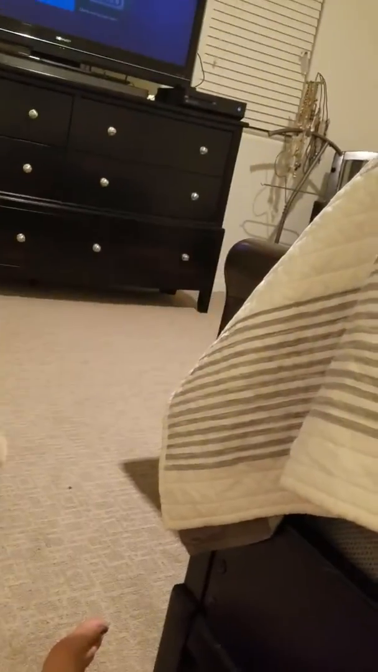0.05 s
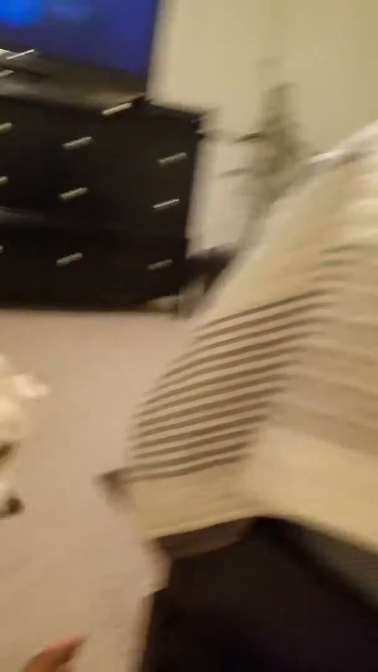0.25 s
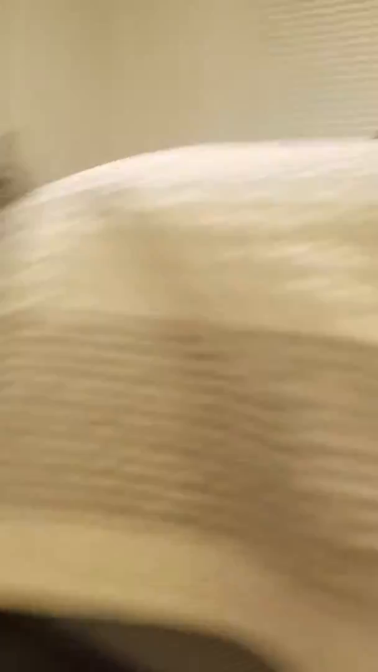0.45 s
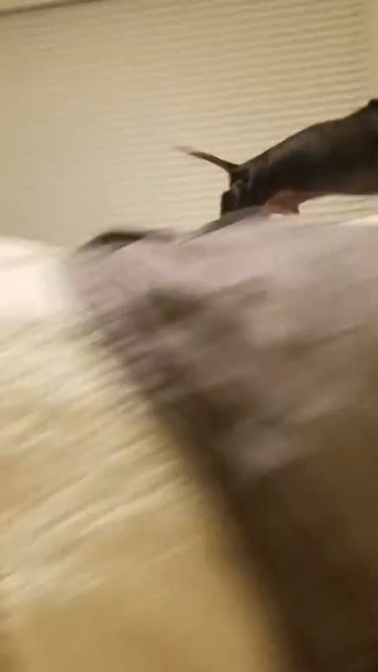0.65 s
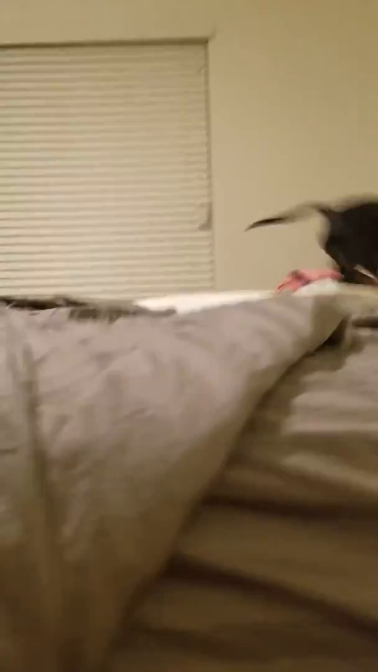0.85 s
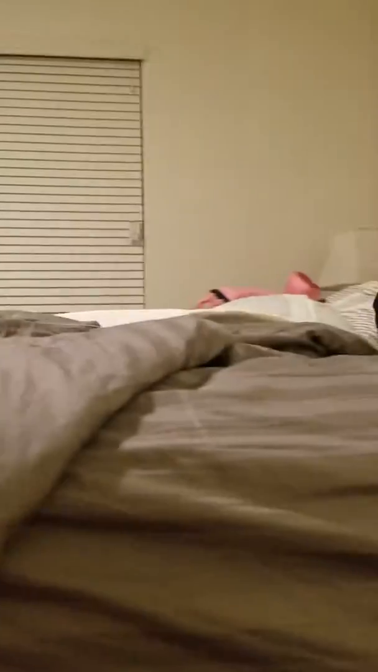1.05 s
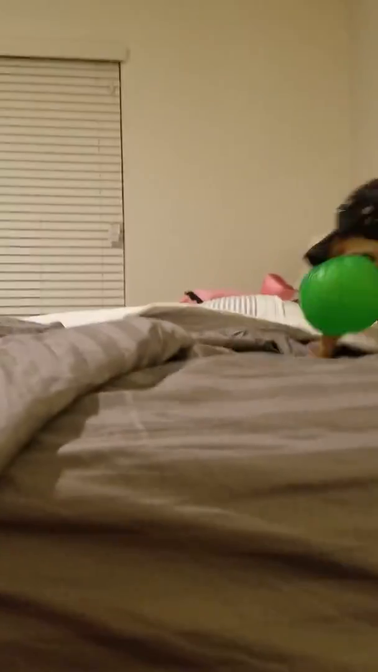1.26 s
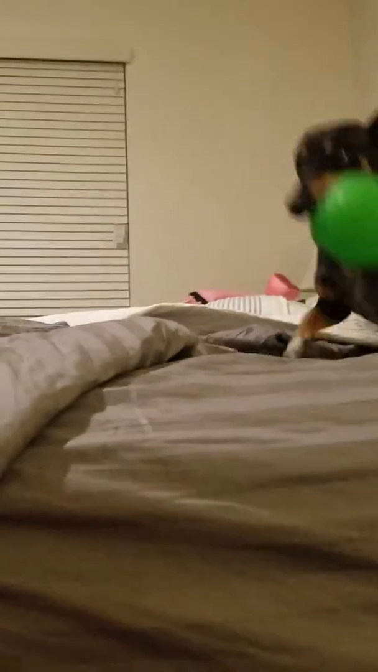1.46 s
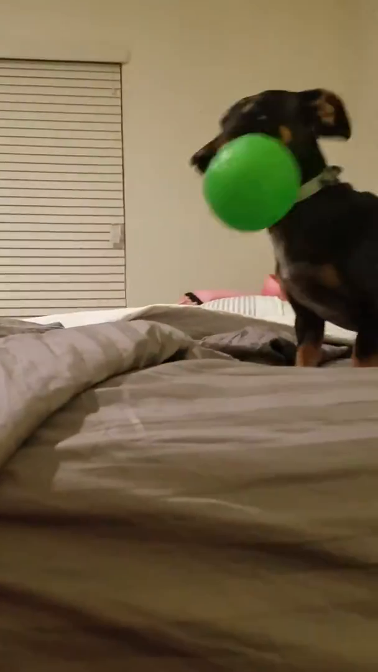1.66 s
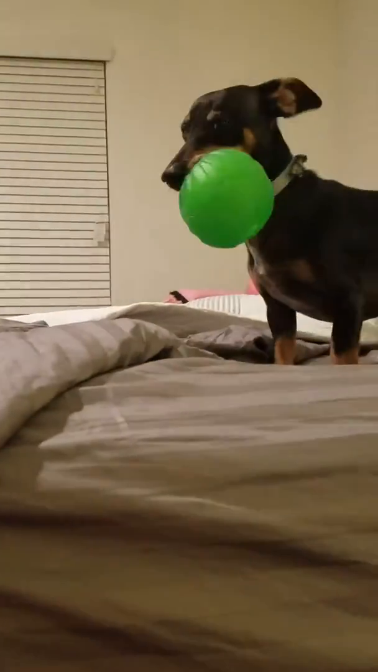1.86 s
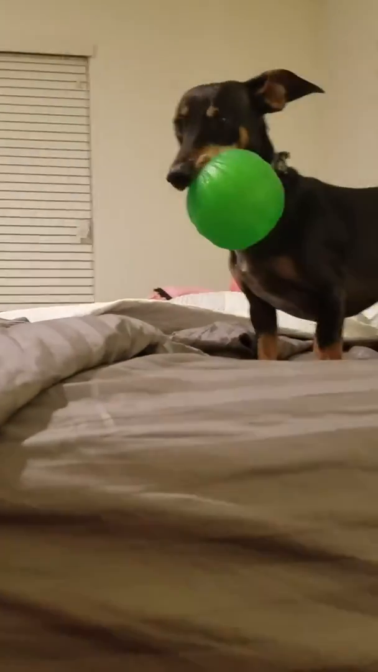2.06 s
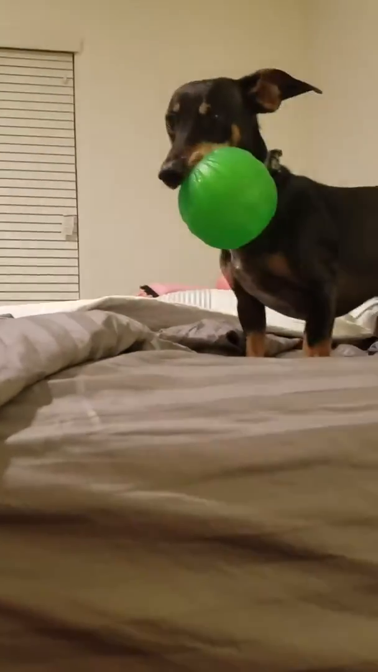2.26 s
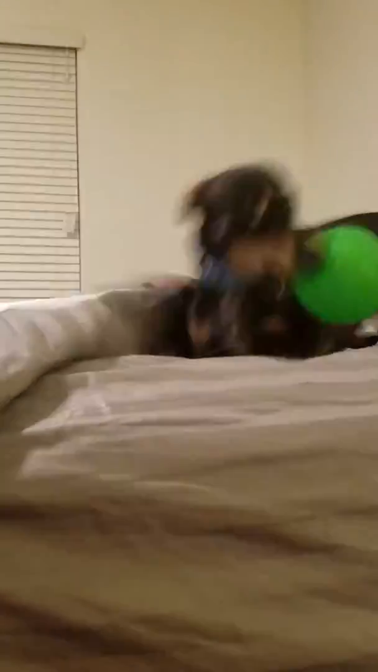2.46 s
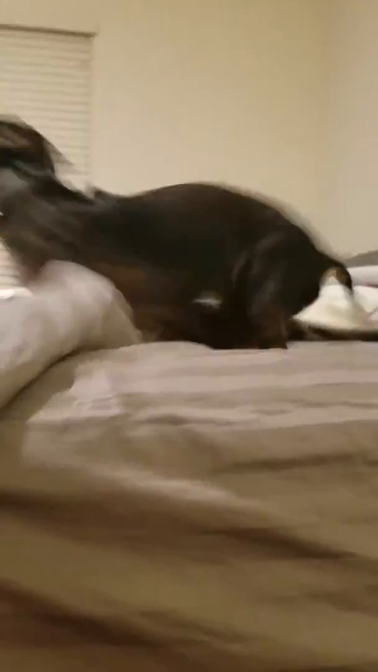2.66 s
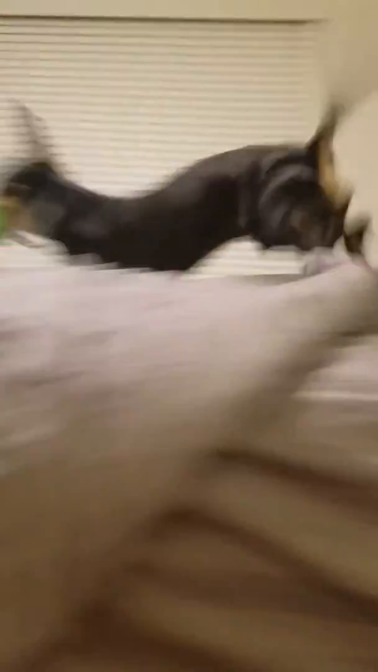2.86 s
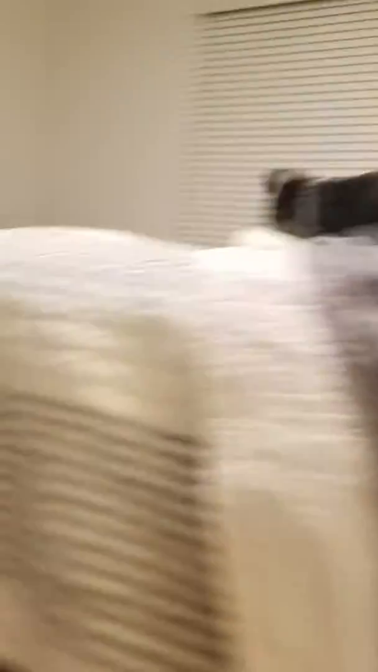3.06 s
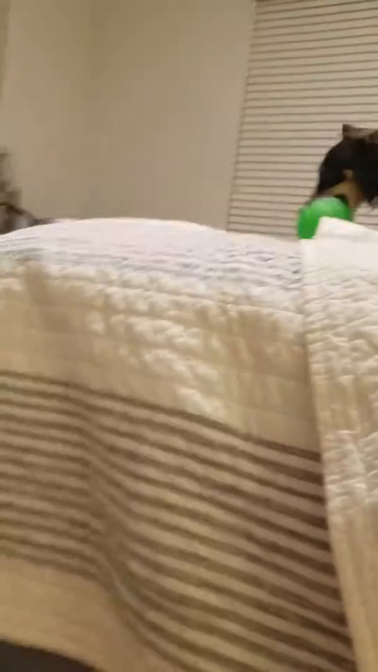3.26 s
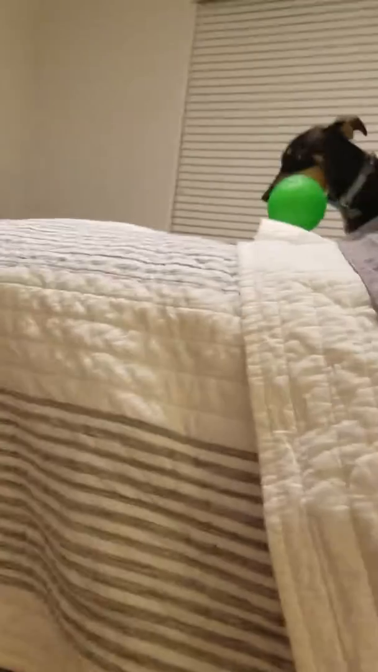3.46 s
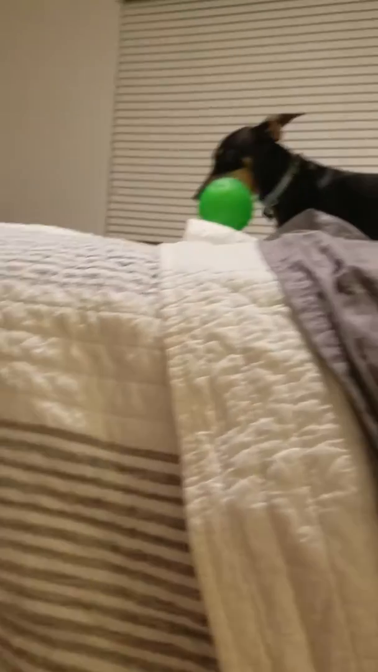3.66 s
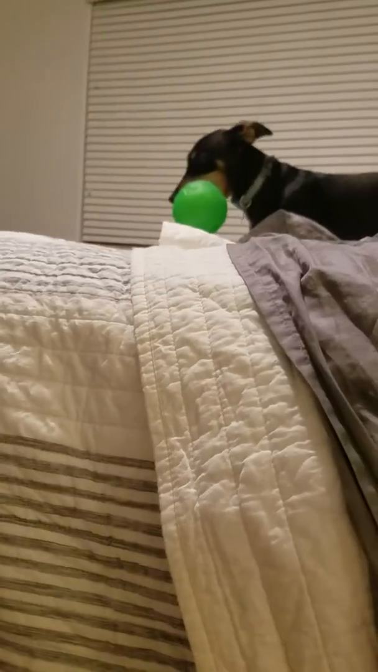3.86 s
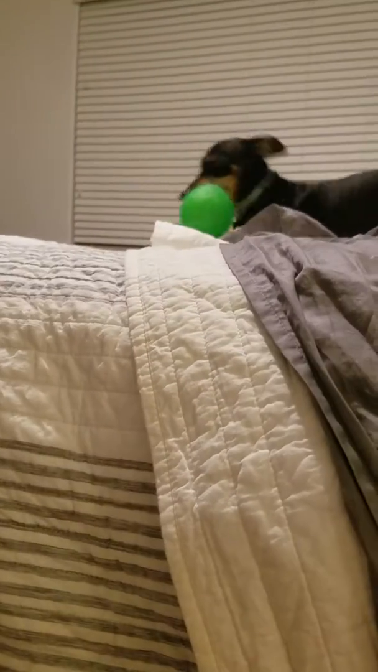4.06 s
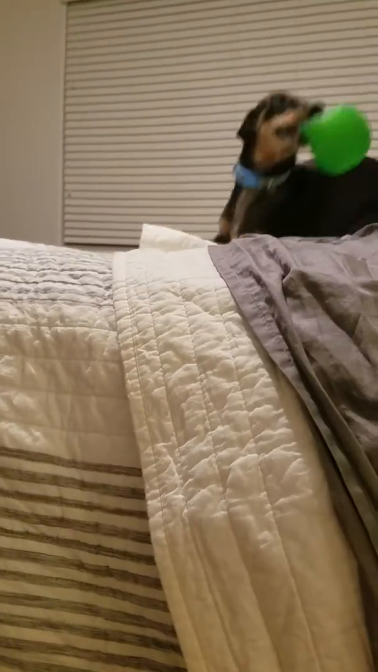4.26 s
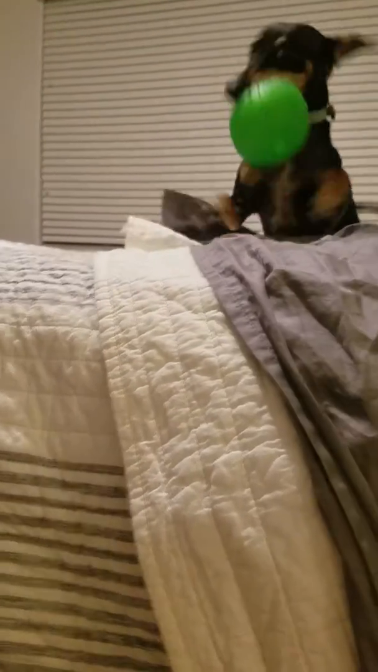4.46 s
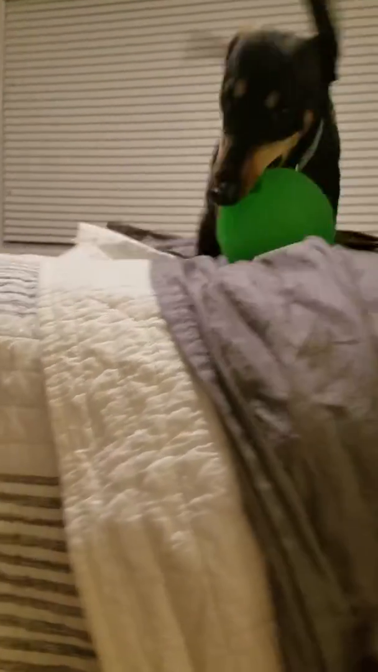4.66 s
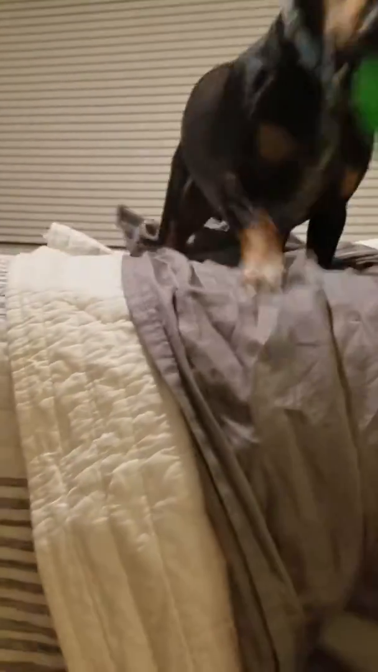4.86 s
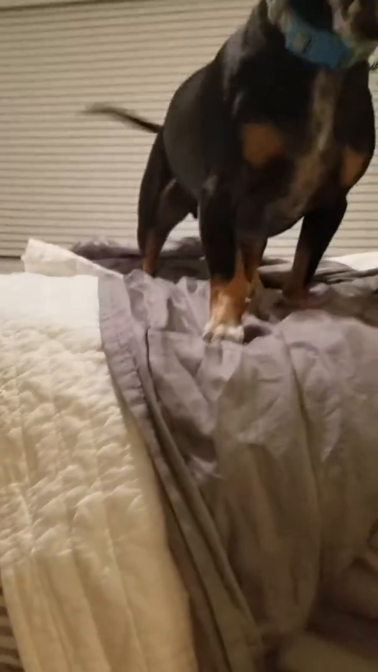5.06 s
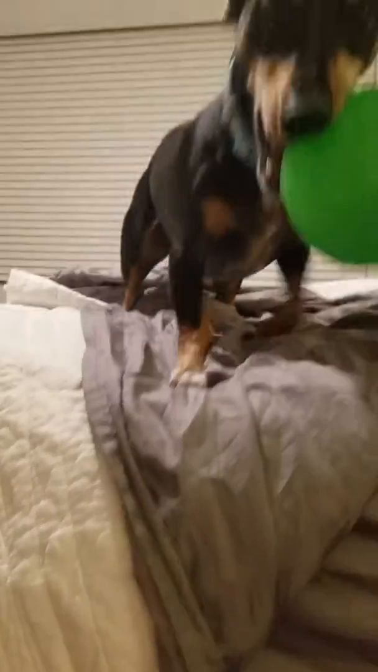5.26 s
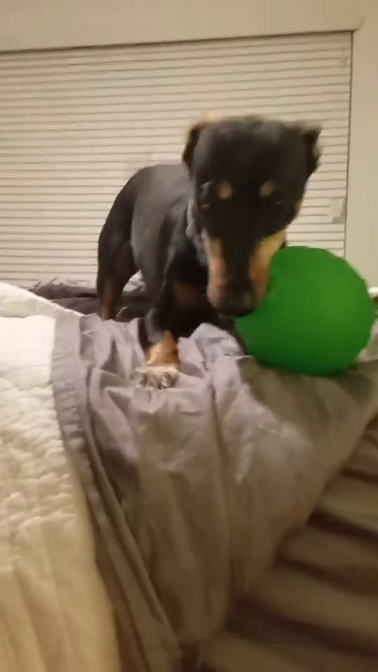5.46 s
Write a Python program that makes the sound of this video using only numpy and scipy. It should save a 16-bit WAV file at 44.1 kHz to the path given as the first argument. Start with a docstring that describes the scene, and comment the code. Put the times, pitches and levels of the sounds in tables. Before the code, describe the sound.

In a quiet carpeted bedroom with a short tail, a handheld stereo microphone is brushed by quilt from 0 to 0.4 s, with fizzing scrape, case rubbing and padded low bumps. Small collar tags jingle at about 0.3, 0.5 and, fainter, around 1 s. A small dog growls through a ball at 0.35 and 0.57 s, muffled, mid-pitched and rising then sagging, followed by low gravelly rattles from 0.84 to 1.2 s and an airy snort near 1.4. A lull has only faint rustle and a tiny clack. From 2.4 to 3 s come louder, rougher growls and a rattle, then a short grunt and snort at 3.25. Another growl at 4.1 s runs into a hissy snort at 4.35 and weak rattles. A sharp ball clack hits at 4.84, more at 5.02 with a bump, then snorts at 5.2 and, faintly, 5.4. Crinkling sheets and mattress thuds continue underneath.

```python
"""A small dog growls through a plastic ball held in its mouth, rattles its voice and snorts through its nose.
Pulses and puffs of air through throat resonances make the voice; clumped noise makes snorts and cloth.
The quilt brushes the microphone, the ball clacks and the collar tags jingle as decaying modes.
Soft bumps, crinkling bedding and a shuddering mattress lie below, in a carpeted bedroom with a short tail."""
import sys
import numpy as np
from scipy import signal
from scipy.fft import rfft, irfft, next_fast_len
from scipy.io import wavfile
from scipy.ndimage import uniform_filter1d

SR = 44100
rng = np.random.default_rng(int(sys.argv[2]) if len(sys.argv) > 2 else 0)


def unload_wav(signal):
    """Save mono or channel-first audio to the path in sys.argv[1] as 16-bit WAV at rate SR, clipped to [-1, 1]."""
    wavfile.write(
        sys.argv[1],
        SR,
        np.round(np.clip(np.atleast_2d(signal).T, -1, 1) * 32767).astype(np.int16),
    )


N = 243431  # length of the scene [samples]
TIME = np.arange(N) / SR

# growl segments, each with its own throat colour; overlapping segments make up one growl: # (start [s], length
# [s], time to the peak of effort [s], # first pitch [Hz], peak pitch [Hz], last pitch [Hz], # fundamental at
# the start before slack [dB], its change over the segment [dB], overtones before trim and slack [dB], # mouth
# resonance at the peak [Hz], resonance behind the teeth [Hz], its strength at the peak [dB], # roughness at the
# peak [0-1], half the strength of the split beat against the fundamental [ratio])
GROWL_SEGMENTS = [ (0.351, 0.27, 0.16, 285.3, 320.1, 310.8, -28.5, -11, -33.5, 1450, 2850, -7.5, .36, 0.079),
                  (0.567, 0.27, 0.11, 311.6, 332.9, 246.5, -34.5, 3.5, -32.5, 1230, 2680, -6, 0.48, 0.07),
                  (2.395, 0.19, 0.074, 322.7, 366.5, 297.6, -26, -6.5, -26.5, 950, 2780, -2, 0.46, 1.2),
                  (2.565, 0.22, 0.11, 299.5, 351, 305.6, -24.5, -7, -25.5, 1030, 2480, -14.5, 0.5, 0.5),
                  (2.775, 0.125, 0.03, 319.4, 313.7, 240.2, -34.5, 8.5, -35.5, 1250, 2550, 1, 0.7, 0.088),
                  (3.208, 0.086, 0.073, 246, 284, 280, -32.5, 6.5, -41.5, 1460, 2950, 10, 0.29, 0),
                  (4.112, 0.255, 0.12, 317.3, 384.1, 275.3, -31, 1.5, -32.5, 1120, 3020, -8, 0.57, 0.073),
                  (4.357, 0.11, 0.025, 323, 323.7, 309, -35, -5, -41, 1250, 2900, -6, .42, 0.24), ]
# one throat colour a segment, as the jaw shifts on the ball: (frequency [Hz], density [dB per Hz])
GROWL_THROATS = [
    [(260, -48), (450, -4.5), (1050, 2), (1340, 6), (1630, -2.5), (2830, 4), (4770, -25), (7690, -19.5),
     (9070, -38), (9770, -28), (10800, -53.5), (12400, -22), (13600, -58), (15100, -34), (16000, -55)],
    [(260, -54), (450, -27), (538, -6.5), (674, -0.5), (771, -6.5), (1210, -4), (2070, -10), (3280, -14.5),
     (6340, -44), (7810, -28), (8930, -61), (10100, -45), (14800, -41), (16000, -37)],
    [(350, -31.5), (600, -9), (906, 0), (1430, -3.5), (1980, -12), (2650, -2.5), (3080, -16), (3730, -11.5),
     (4340, -33.5), (5400, -27.5), (6030, -35), (7730, -20), (9490, -56), (10600, -31.5), (16000, -39)],
    [(260, -35), (450, 5), (616, -8.5), (922, 0), (993, -12.5), (1070, -3.5), (1380, -6), (2660, -7),
     (3140, -19.5), (5300, -30.5), (5790, -36), (7580, -23), (9770, -49), (11700, -32.5), (16000, -39)],
    [(260, -29), (450, 2), (650, -8), (1380, -7.5), (2660, -5), (3300, -15), (5500, -40), (7580, -25),
     (9770, -57), (11700, -22.5), (16000, -35)],
    [(260, -26), (450, -3), (1190, -8), (1530, 5), (1920, -13), (2260, 2), (4300, -22), (7140, -16.5),
     (16000, -61)],
    [(260, -48), (450, 8), (635, -8), (868, 1), (979, -11), (1440, -4.5), (1750, -5), (3000, -3.5),
     (4170, -22.5), (4630, -22.5), (5710, -26.5), (7690, -21), (11000, -42), (12200, -31), (16000, -32)],
    [(260, -35), (450, -10), (1500, -2), (3000, 1), (4500, -18), (7700, -26), (16000, -41)],
]
EFFORT_SHAPE = 1.3  # exponent; above 1 the effort is pointed
# change from the peak of effort to full slack
SLACK_CHEST_DB, SLACK_VOICE_DB, SLACK_TEETH_DB = -2.5, -7, -14.5
SLACK_MOUTH, SLACK_ROUGH = 0.065, 0.06  # share by which the mouth resonance drops; added roughness
# the overtones open gradually and close more abruptly; each segment has short edges
VOICE_OPEN_S, VOICE_CLOSE_S, GROWL_EDGE_S = 0.034, 0.026, 0.016


def growl(row, throat, jitter=0.12, flutter=0.54, mouth_db=2, mouth_width=240, teeth_width=480, trim_db=3):
    """Folds beat unevenly under flapping tissue; one arch of effort steers pitch, level, mouth and roughness."""
    (start, length, peak_s, first_hz, top_hz, last_hz, low_db, change_db, high_db,
     mouth_hz, teeth_hz, bared_db, rough, beating) = row
    t = clock(length)
    size = len(t)
    effort = np.interp(t, [0, min(peak_s, t[-1]), length], [0, 1, 0]) ** EFFORT_SHAPE
    slack = 1 - effort
    hz = top_hz * effort + np.where(t < peak_s, first_hz, last_hz) * slack
    rough = np.clip(rough + SLACK_ROUGH * slack, 0, 1)
    turns = np.cumsum(hz * (1 + jitter * rough * wander(size, 170))) / SR
    flap = np.exp(flutter * rough * wander(size, 150))

    # rough growls trade clean pulses for puffs of air
    puffs = (0.15 + np.exp(-(turns % 1) / 0.25)) * rng.standard_normal(size)
    drive = flap * ((1 - rough) * pulses(turns) + rough * evened(puffs))
    voice = colour(colour(drive, throat), [(250, -26.5), (400, -29), (500, -12)])
    mouth = amp(mouth_db) * resonate(voice, mouth_hz * (1 - SLACK_MOUTH * slack), mouth_width)
    teeth = amp(bared_db + SLACK_TEETH_DB * slack) * resonate(voice, teeth_hz, teeth_width)
    opening = np.clip(np.minimum(t / VOICE_OPEN_S, (length - t) / VOICE_CLOSE_S), 0, 1)
    overtone_gain = amp(high_db + trim_db + SLACK_VOICE_DB * slack)
    overtones = opening * overtone_gain * steadied(voice + mouth + teeth)

    # the fundamental leaves through the chest and nose, past the ball that blocks the mouth
    chest = steadied(flap * np.cos(2 * np.pi * turns))
    # pushed hard, the folds split into strong and weak beats: a line at 1.5 times the pitch
    split = 2 * beating * effort * steadied(flap * np.cos(3 * np.pi * turns))
    chest_gain = amp(low_db + change_db * t / length + SLACK_CHEST_DB * slack)
    low = chest_gain * (chest + split)
    edges = np.clip(np.minimum(t, length - t) / GROWL_EDGE_S, 0, 1)
    return start, edges * (low + overtones)


# low rattling growls: (start [s], attack [s], hold [s], level before trim [dB], mouth resonance [Hz])
RATTLING_GROWLS = [(0.84, 0.015, 0.11, -30.5, 1050), (0.988, .03, 0.067, -32, 1020),
                   (1.17, .02, 0.026, -41, 1490), (2.368, .014, .025, -40.5, 1240),
                   (2.925, 0.036, 0.026, -29.5, 1420), (3.008, .025, .07, -39.5, 1400),
                   (4.524, 0.011, 0.0026, -45.5, 1350), (4.636, 0.044, .02, -44, 1390)]
# throat colour of the rattles: (frequency [Hz], density [dB per Hz])
RATTLING_THROAT = [(35, -34.5), (60, -12), (206, 3), (237, -9), (273, 5), (629, -12.5), (994, -11.5),
                   (1080, -7), (2080, -19.5), (2860, -16), (3090, -26), (7000, -37), (9100, -64),
                   (15400, -120)]
RATTLE_T60_S = 0.14


def rattle(start, attack, hold, db, mouth_hz, hz=116, jitter=0.18, air=0.97, uneven_db=2,
           trim_db=-0.5, mouth_width=150):
    """The voice drops to slow, uneven slaps of the folds."""
    t = clock(attack + hold + RATTLE_T60_S)
    size = len(t)
    turns = np.cumsum(hz * (1 + jitter * wander(size, 80))) / SR
    puffs = evened((0.14 + np.exp(-(turns % 1) / 0.22)) * rng.standard_normal(size))
    slaps = (pulses(turns) + air * puffs) * amp(uneven_db * wander(size, 70))
    voice = colour(slaps, RATTLING_THROAT)
    voice = voice + resonate(voice, mouth_hz, mouth_width)
    envelope = swell(t, attack, hold, RATTLE_T60_S)
    return start, envelope * amp(db + trim_db) * steadied(voice, size=1500)


# snorts: (start [s], attack [s], hold [s], nose resonances before trim [dB], hiss before trim [dB],
#  time to the peak of the hiss [s])
NOSE_SNORTS = [(1.345, 0.036, 0.034, -30.5, -37.5, 0.1), (3.265, 0.024, .02, -32.5, -47.5, 0.029),
               (4.336, 0.037, 0.057, -33, -32.5, 0.027), (5.188, .06, .058, -31, -37.5, .074),
               (5.418, 0.017, 0.0085, -45.5, -59, 0.02)]
# one nasal colour a snort: (frequency [Hz], density [dB per Hz])
NOSE_PASSAGES = [
    [(120, -47.5), (200, -18), (288, -27), (480, -17), (535, -7), (628, -34.5), (681, -22), (967, -16.5),
     (1230, -6), (1340, -11.5), (1530, -1), (1950, -14), (2500, -6), (3200, -22.5), (5000, -37),
     (6500, -58), (11000, -120)],
    [(240, -40), (400, -1.5), (474, -8.5), (1000, -12.5), (1150, 0), (1610, 3), (2120, -0.5), (2390, -6),
     (2740, -7), (3880, -8.5), (5000, -57), (6500, -61), (11000, -120)],
    [(240, -21), (400, -4), (617, -32), (778, 2), (838, -18), (1240, 4.5), (1350, 1), (1550, 0), (1990, 10),
     (2490, -1), (3110, -4), (5000, -32), (6500, -72), (11000, -120)],
    [(120, -58), (200, -13.5), (312, -16), (443, -0.5), (637, -25), (709, -8.5), (1010, -20.5),
     (1660, -1.5), (1870, -9), (2000, -2), (2260, -11.5), (2550, -6.5), (3870, -16.5), (5000, -34),
     (6500, -67), (11000, -120)],
    [(240, -41), (400, -17), (1060, -7), (1700, -1.5), (2150, -12), (2490, -3), (3170, -30), (5000, -46),
     (6500, -57), (11000, -120)],
]
# hiss above the nose resonances: (frequency [Hz], density [dB per Hz])
NOSTRIL_HISS = [(2350, -3.5), (4000, 1.5), (4540, -12), (5500, -8.5), (5970, -10), (7790, -6),
                (9440, -26.5), (13000, -15), (16000, -23)]
SNORT_T60_S, HISS_T60_S = 0.33, 0.29


def snort(row, passage, trim_db=2.5, hiss_trim_db=-1):
    """Air forced through fluttering nostrils: clumped noise rings the nose and hisses above it."""
    start, attack, hold, db, high_db, hiss_s = row
    t = TIME[:SR // 2]
    air = crinkle(len(t), clump_db=3, clump_hz=154)
    nose = swell(t, attack, hold, SNORT_T60_S) * steadied(colour(air, passage))
    hiss = swell(t, hiss_s, hold=0.0053, t60=HISS_T60_S) * steadied(colour(air, NOSTRIL_HISS))
    return start, amp(db + trim_db) * nose + amp(high_db + hiss_trim_db) * hiss


# quilt against the microphone, as a thin fizz that sags and a harder scrape that grows over its hold:
# (start [s], attack [s], hold [s], t60 [s], level before its filter [dB], change over the hold [dB])
QUILT_FIZZ = (0.045, .05, .1, .25, -24, -5.5)
QUILT_SCRAPE = (0.004, .085, .095, .27, -30.5, 5.5)
# the case shakes at the touch and in the drag:
# (start [s], attack [s], hold [s], t60 [s], level [dB], change over the hold [dB])
CASE_RUBS = [(0.008, .025, 0.014, 0.14, -30, -0.88), (0.068, .022, 0.11, 0.13, -26.5, -1.1)]
# colour of the scraping fibres: (frequency [Hz], density [dB per Hz])
FIBRE_COLOUR = [(410, -4.5), (700, -7.5), (819, -5), (1200, -2.5), (1420, -11.5), (1710, 1), (2000, -2),
                (2590, 0), (5060, -16), (7990, -10.5), (9860, -32.5), (11800, -17), (16000, -24)]
# colour of the shaken case: (frequency [Hz], density [dB per Hz])
CASE_COLOUR = [(80, -29), (140, 0), (300, 8.5), (500, 1), (700, -8.5), (1200, -25), (4000, -69)]


def brush():
    """Quilt fibres catch and let go in clumps of noise, and shake the microphone's case."""
    fibres = steadied(colour(crinkle(SR, clump_db=2, clump_hz=292), FIBRE_COLOUR))
    fizz = colour(fibres, [(3000, -30), (5000, 0.5)])
    scrape = colour(fibres, [(4000, 1), (7000, -21.5)])
    rub = steadied(colour(rng.standard_normal(SR), CASE_COLOUR))
    pressing = sum(stroke(*row) for row in CASE_RUBS)
    fibre_sound = stroke(*QUILT_FIZZ)[:SR] * fizz + stroke(*QUILT_SCRAPE)[:SR] * scrape
    return 0, fibre_sound + pressing[:SR] * rub


# teeth and claws on the ball: (time [s], strike level [dB], ring against the strike [dB],
#  dull knock against the strike [dB])
BALL_CLACKS = [(1.672, -47, -31, 6), (3.679, -51, -18, -6), (3.884, -43, -44, -24), (4.031, -52.5, -33, 5),
               (4.797, -37, -28, -4), (4.81, -47, 4, 6), (4.836, -17.5, -10, -19), (5.014, -26, -17, -2),
               (5.0225, -23.5, -32, 3.5), (5.039, -42, -19, -8), (5.171, -40, -34, -27),
               (5.19, -35, -30, -26), (5.516, -46, -8, 5)]
# modes of the hollow ball: (frequency [Hz], level before random weighting [dB], t60 [s])
BALL_MODES = [(1634, -1.5, 0.1), (1753, 6, 0.05), (2060, -14, 0.8), (2460, 2, 0.027), (2740, -21.5, 0.87),
              (2920, 6.5, 0.015), (3270, -27, 0.15), (6573, -31, 0.74), (7171, -33.5, 0.38)]


def clack(s, db, ring_db, knock_db, tick_t60=0.016, knock_hz=600, knock_t60=0.016):
    """A hard tick of noise, the ring of the ball and a dull knock of the jaw."""
    shell = ring(BALL_MODES, spread_db=1)
    t = np.arange(len(shell)) / SR
    tick_colour = [(300, -27), (1200, 1), (2200, 22), (4500, -5), (8000, -3), (10000, -12), (15000, -1.5)]
    tick = evened(colour(rng.standard_normal(len(t)), tick_colour)) * amp(-60 * t / tick_t60)
    knock = np.sin(2 * np.pi * knock_hz * t) * amp(-60 * t / knock_t60)
    return s, amp(db) * (0.54 * tick + amp(ring_db) * shell + amp(knock_db) * knock)


# collar tags meeting: (time around which the chatter starts [s], first touch before halving [dB])
TAG_JINGLES = [(0.254, -61), (0.282, -38), (0.314, -35), (0.478, -42), (0.497, -39), (0.71, -57),
               (0.936, -47), (1.03, -46), (1.11, -48.5), (2.83, -54)]
# modes of the metal tags: (frequency before detuning [Hz], level before random weighting [dB], t60 [s])
TAG_MODES = [(5530, -9.5, 0.049), (5970, -0.5, 0.041), (7620, -5.5, 0.17), (10140, -29, .1),
             (10000, -17.5, 0.14), (11770, -5.5, 0.093), (12800, -8, .1), (14696, -1, 0.036),
             (14800, -12.5, 0.092)]


def jingle(s, db, count=5, fall_db=2):
    """Tags chatter a few times, each touch softer and freshly detuned."""
    chatter = np.zeros(SR // 2)
    delays = np.cumsum(rng.uniform(0.003, 0.013, count)) - 0.006
    for touch, delay in enumerate(delays):
        metal = ring(TAG_MODES, spread_db=6, detune=0.007) / 2
        add(chatter, delay, amp(db - fall_db * touch) * metal)
    return s, chatter


# soft bumps on bed and microphone: (time [s], envelope peak [dB], settled pitch [Hz], time to the peak [s])
SOFT_BUMPS = [(0.018, -20.5, 168, 0.032), (0.073, -17, 172.5, .019), (0.101, -21.5, 325.4, 0.016),
              (0.152, -23, 336, 0.017), (0.235, -20.5, 120.5, 0.014), (0.265, -26.5, 75.6, 0.024),
              (5.072, -22.5, 292, 0.0025), (5.086, -32.5, 241, 0.0063), (5.101, -41, 375, 0.01),
              (5.375, -34.5, 97.4, 0.012)]


def bump(s, db, hz, rise, sag=0.45):
    """A padded blow: a few low cycles whose pitch sags as the contact relaxes."""
    t = np.arange(SR // 4) / SR
    u = t / max(rise, 0.001)
    turns = np.cumsum(hz * (1 + sag * np.exp(-2 * u))) / SR
    envelope = u ** 2 * np.exp(1 - u ** 2)
    return s, amp(db) * envelope * np.sin(2 * np.pi * turns)


# bouts of romping that stir the bedding:
# (start [s], attack [s], hold [s], t60 [s], level [dB], change over the hold [dB])
ROMPING_BOUTS = [(0.0, 0.0033, 0.36, 0.63, -37, -6), (0.365, .1, 0.71, 0.12, -42.5, -6),
                 (1.136, 0.083, 0.031, 0.25, -44.5, -2), (1.25, 0.11, 0.38, 0.25, -50, -4),
                 (2.304, 0.16, 0.53, 0.52, -43.5, 1.5), (3.173, 0.07, .17, .4, -52.5, 0.5),
                 (4.023, 0.11, 0.45, .3, -51.5, -4), (4.487, 0.084, 0.17, 0.4, -50, -0.5),
                 (4.791, .08, 0.24, 0.4, -49.5, -1.5), (5.178, 0.046, .25, 0.65, -52.5, -3)]
# colour of the sheets: (frequency [Hz], density [dB per Hz])
SHEET_COLOUR = [(88, -43.5), (150, -3.5), (398, -1.5), (431, 1), (484, -5), (941, -8.5), (1690, -5),
                (2060, -9), (7470, -28.5), (9440, -42.5), (15100, -26), (16000, -37.5)]


def bedding(romping):
    """Sheets crinkle in clumps of noise as the dog steps and turns."""
    return romping * evened(colour(crinkle(N, clump_db=2.5, clump_hz=120), SHEET_COLOUR))


# the dog's weight lands on the mattress: (time [s], level before trim [dB])
PAW_LANDINGS = [(0.24, -35), (0.44, -48), (0.53, -44.5), (0.66, -47), (0.832, -32), (0.91, -42),
                (1.02, -37), (1.175, -47), (1.41, -37.5), (1.52, -62), (2.41, -36.5), (2.5, -43),
                (2.65, -43.5), (2.94, -45), (3.19, -49), (3.66, -64.5), (4.02, -57), (4.14, -46),
                (4.24, -61), (4.581, -53), (4.82, -54), (5.23, -53.5), (5.36, -53)]
# colour of the mattress: (frequency [Hz], density [dB per Hz])
MATTRESS_COLOUR = [(15, -24.5), (25, -12.5), (35, -13.5), (70, -3), (120, -2), (190, -7.5), (350, -12.5),
                   (900, -55)]


def rumble(romping, shake_db=-9, trim_db=-1.5, apart=0.51):
    """The mattress shudders under the romping and after each landing, nearly alike in both ports."""
    shake = amp(shake_db) * romping
    thud = swell(TIME[:SR], attack=0.02, hold=0, t60=0.48)
    for s, db in PAW_LANDINGS:
        add(shake, s, amp(db) * thud)
    noise = rng.standard_normal(N) + apart * rng.standard_normal((2, N))
    return amp(trim_db) * shake * evened(colour(noise, MATTRESS_COLOUR))


# colour of the quiet house: (frequency [Hz], density [dB per Hz])
HOUSE_COLOUR = [(12, -35.5), (20, 2), (60, -14), (96, -5.5), (718, -22.5), (2080, -25.5), (2260, -21.5),
                (2460, -29.5), (3070, -26), (4180, -31.5), (4940, -34.5), (6360, -35.5), (16000, -39)]


def floor(level_db=-65.5):
    """The quiet of the house: steady noise, half shared by the ports."""
    noise = rng.standard_normal(N) + rng.standard_normal((2, N))
    return amp(level_db) * evened(colour(noise, HOUSE_COLOUR))


# decay of the bedroom: (frequency [Hz], t60 [s])
ROOM_DECAY = [(150, 0.74), (500, 0.54), (1500, 0.47), (3000, 0.31), (8000, 0.16), (16000, 0.096)]


def reflections(early=2.43, early_s=0.0076):
    """Bed and wall answer at once; dense echoes follow in both ports and die band by band."""
    after = TIME[:SR // 2]
    sparse = rng.random((2, SR // 2)) < 0.12
    taps = rng.standard_normal((2, SR // 2)) * sparse * (after > 0.0006)
    hz, t, z = signal.stft(taps * (1 + early * np.exp(-after / early_s)), SR, nperseg=256)
    t60 = read(ROOM_DECAY, hz)[:, None]
    tail = signal.istft(z * amp(-60 * t / t60) / np.sqrt(t60), SR, nperseg=256)[1]
    return tail / np.linalg.norm(tail, axis=1, keepdims=True)


# room against direct sound: (frequency [Hz], gain [dB])
ROOM_GAIN = [(100, -12), (300, -5.5), (700, 1.5), (1500, 4.5), (4000, 3.5), (14000, 6)]


def room(x, lag=9):
    """Direct sound reaches the right a few samples late; echo patterns crossfade as dog and microphone move."""
    wet = np.zeros((2, N))
    for place in range(4):
        away = (TIME * 9 - place + 2) % 4 - 2  # nine places a second, cycling through four
        here = np.cos(np.pi / 2 * np.clip(away, -1, 1))
        wet += signal.oaconvolve((x * here)[None], reflections(), axes=1)[:, :N]
    direct = np.array([x, np.pad(x, (lag, 0))[:N]])
    return direct + colour(wet, ROOM_GAIN)


def ring(modes, spread_db, detune=0):
    """Dying modes; each blow lands elsewhere and so weights them anew."""
    t, out = np.arange(SR // 3) / SR, 0
    for hz, db, t60 in modes:
        weight, shift, phase = rng.uniform(-1, 1, 3)
        decay = amp(db + spread_db * weight - 60 * t / t60)
        out = out + decay * np.sin(2 * np.pi * hz * (1 + detune * shift) * t + np.pi * phase)
    return out


def resonate(x, hz, width):
    """A resonance of gain 1 that follows the curve hz."""
    turn = np.exp(2j * np.pi * np.cumsum(hz * np.ones(len(x))) / SR)
    r = np.exp(-np.pi * width / SR)
    # shift the resonance down to 0 Hz, smooth, and shift back
    return 2 * (turn * signal.lfilter([1 - r], [1, -r], x / turn + 1e-18)).real


def pulses(turns):
    """One sharp pulse at each whole turn."""
    whole = np.floor(turns)
    return evened(np.diff(whole, prepend=whole[0]) + 1e-9)


def crinkle(size, clump_db, clump_hz):
    """Noise whose level wanders in decibels, so that it comes in clumps."""
    return evened(rng.standard_normal(size) * amp(clump_db * wander(size, clump_hz)))


def wander(size, hz):
    """Smooth, bounded chance of rms 1, fading out above hz."""
    length = next_fast_len(size)
    f = np.fft.rfftfreq(length, 1 / SR)
    smooth = np.exp(-(f / hz) ** 2) * (f > 0)
    drift = irfft(rfft(rng.standard_normal(length)) * smooth, length)[:size]
    return evened(np.tanh(evened(drift)))


def stroke(start, attack, hold, t60, db, droop_db):
    """The gain of one movement over the whole scene."""
    return amp(db) * swell(TIME - start, attack, hold, t60, droop_db)


def swell(t, attack, hold, t60, droop_db=0):
    """A smooth rise, a hold that may change level, and a dying release."""
    rise = np.sin(np.pi / 2 * np.clip(t / max(attack, 0.001), 0, 1)) ** 2
    held = np.clip((t - attack) / max(hold, 0.001), 0, 1)
    released_s = np.maximum(t - attack - hold, 0)
    return rise * amp(droop_db * held - 60 * released_s / t60)


def steadied(x, size=900):
    """Holds the power near 1 over size samples: the breath stays steady however the sound stumbles."""
    return x / np.sqrt(abs(uniform_filter1d(x ** 2, size)) + 1e-12)


def evened(x):
    """Scales to rms 1."""
    return x / np.sqrt(np.mean(x ** 2) + 1e-20)


def colour(x, points):
    """Minimum-phase filter from (frequency [Hz], gain [dB]): it rings only after it is struck."""
    size = 2 * next_fast_len(x.shape[-1] // 2 + 4096)
    gain_db = np.maximum(read(points, abs(np.fft.fftfreq(size, 1 / SR))), -100)
    log_gain = np.log(amp(gain_db))
    response = np.exp(np.conj(signal.hilbert(log_gain)))[:size // 2 + 1]
    return irfft(rfft(x, size) * response, size)[..., :x.shape[-1]]


def read(points, hz):
    """Reads a table of (frequency [Hz], value) on a log-frequency axis."""
    f, value = np.transpose(points)
    return np.interp(np.log(hz + 1), np.log(f + 1), value)


def amp(db):
    """Decibels to gain."""
    return 10 ** (np.asarray(db) / 20)


def clock(length):
    """Sample times of a sound, from its own start."""
    return np.arange(round(length * SR)) / SR


def add(mix, s, sound):
    """Mixes a sound in at time s."""
    part = mix[max(round(s * SR), 0):][:len(sound)]
    part += sound[:len(part)]


def scene():
    """The dog and its things sound in the room; bumps reach the microphone directly."""
    romping = sum(stroke(*row) for row in ROMPING_BOUTS)
    in_room, near = bedding(romping), np.zeros(N)
    for row, throat in zip(GROWL_SEGMENTS, GROWL_THROATS):
        add(in_room, *growl(row, throat))
    for row in RATTLING_GROWLS:
        add(in_room, *rattle(*row))
    for row, passage in zip(NOSE_SNORTS, NOSE_PASSAGES):
        add(in_room, *snort(row, passage))
    add(in_room, *brush())
    for row in BALL_CLACKS:
        add(in_room, *clack(*row))
    for row in TAG_JINGLES:
        add(in_room, *jingle(*row))
    for row in SOFT_BUMPS:
        add(near, *bump(*row))
    return room(in_room) + near + rumble(romping) + floor()


# balance of the two microphone ports: (frequency [Hz], left minus right [dB])
PORT_BALANCE = [(60, 0), (270, -1), (500, -0.5), (900, 0), (1400, -3), (2200, -7), (3300, -9), (5500, -4.5),
                (9000, -4.5), (15000, 2)]
EDGE_HZ = 15950  # upper band limit


def record(dry):
    """Splits the port balance evenly between left and right, then limits the band."""
    size = next_fast_len(N + 2048)
    half_db = read(PORT_BALANCE, np.fft.rfftfreq(size, 1 / SR)) / 2
    ports = irfft(rfft(dry, size) * amp([half_db, -half_db]), size)[:, :N]
    low_pass = signal.firwin(511, EDGE_HZ, window=("kaiser", 9), fs=SR)
    return signal.oaconvolve(ports, low_pass[None], "same", axes=1)


dry = scene()
out = record(dry)
unload_wav(out)
```